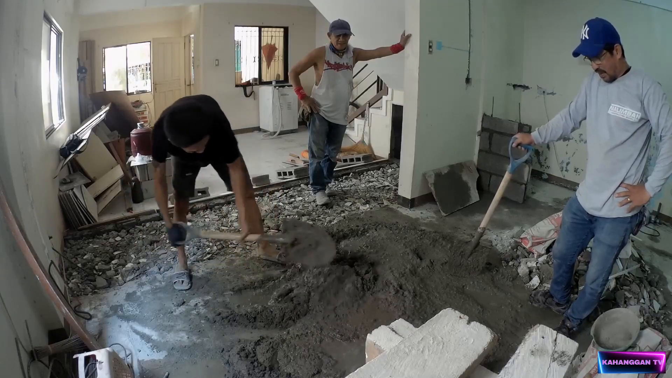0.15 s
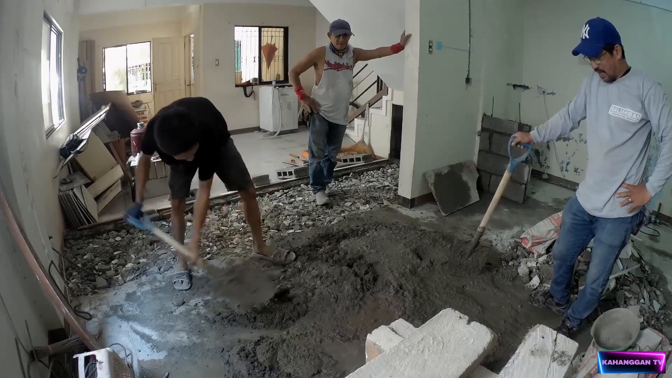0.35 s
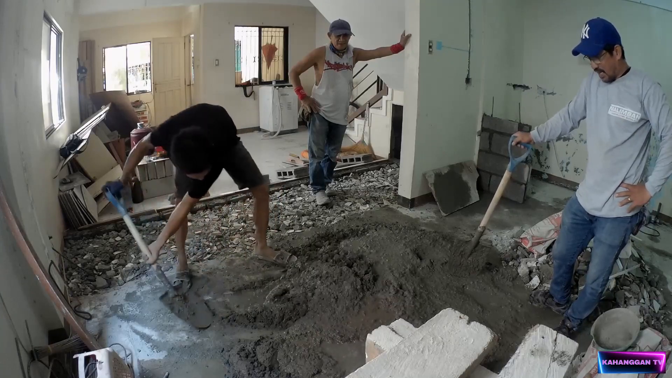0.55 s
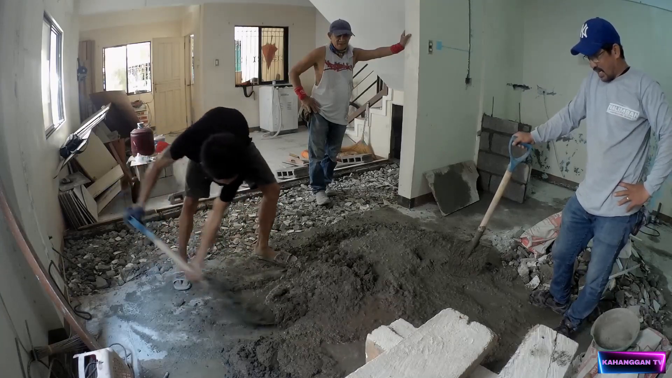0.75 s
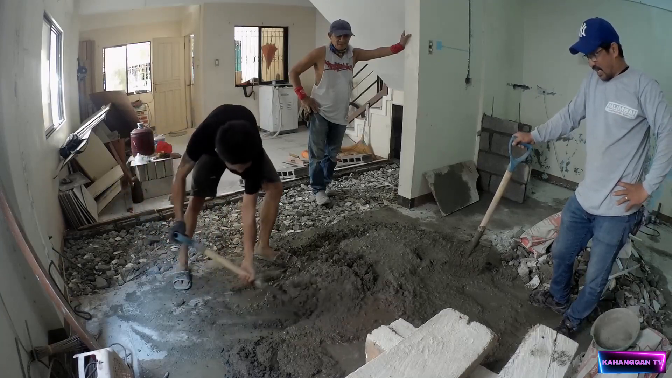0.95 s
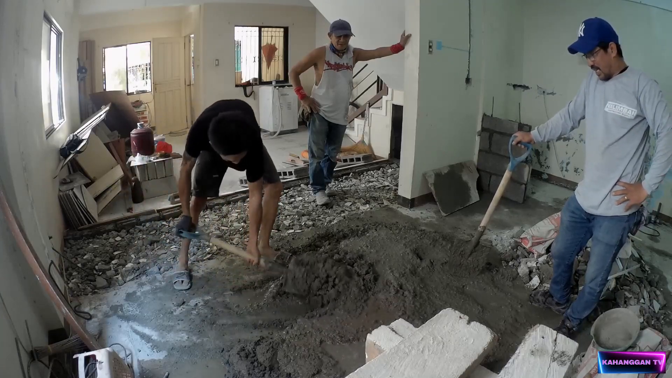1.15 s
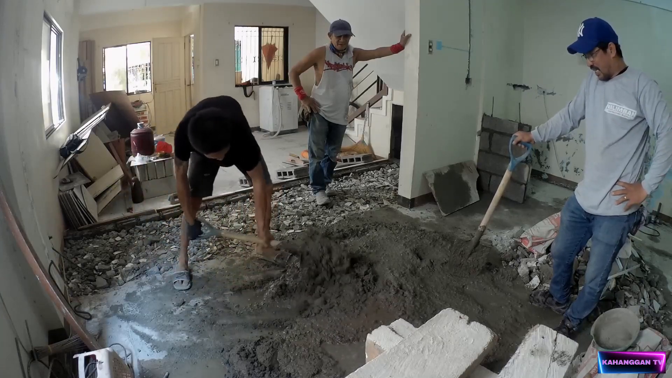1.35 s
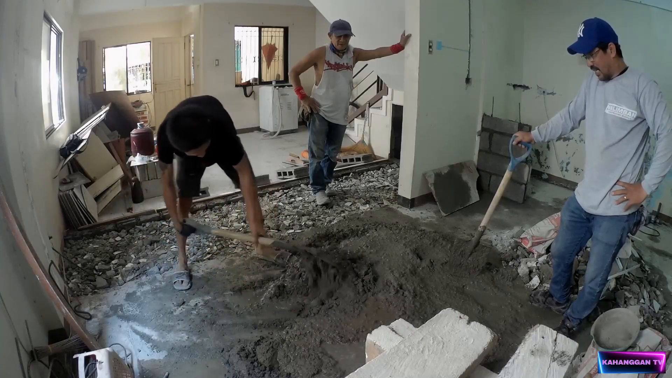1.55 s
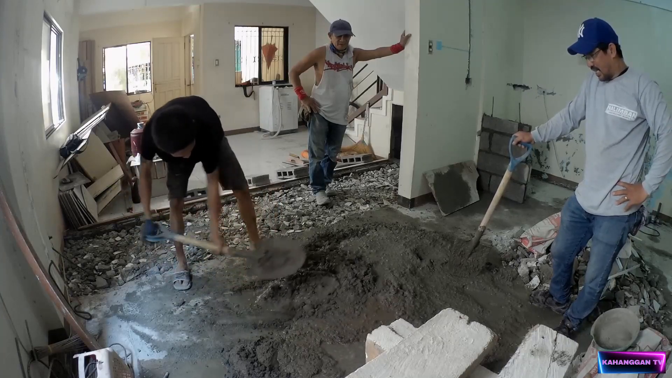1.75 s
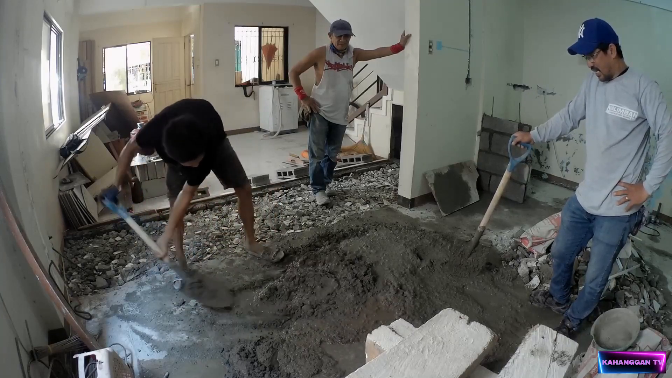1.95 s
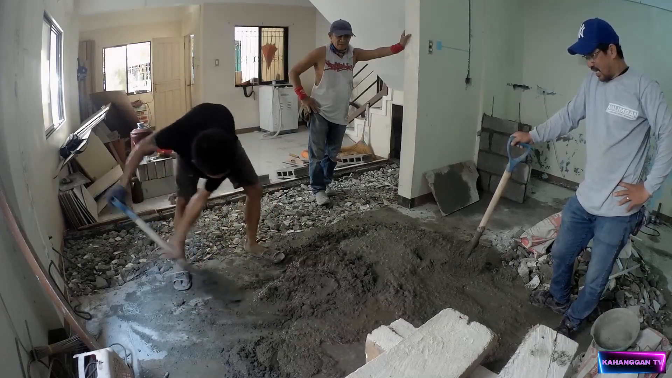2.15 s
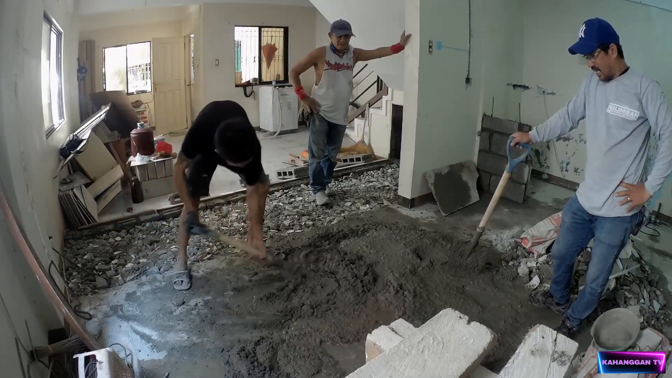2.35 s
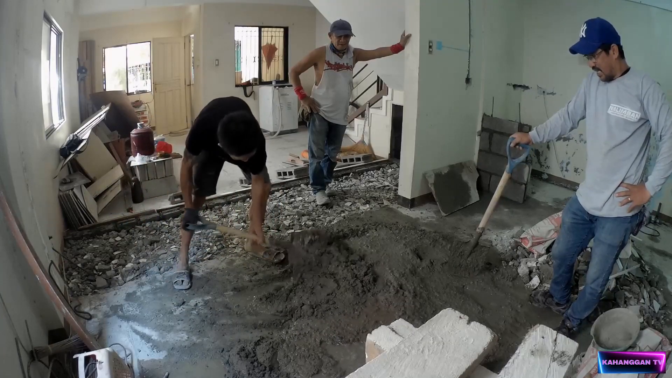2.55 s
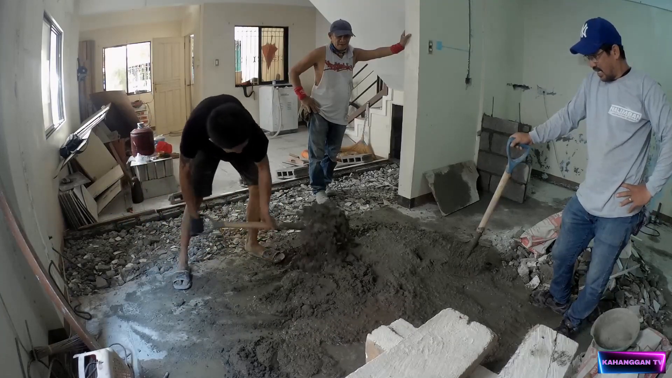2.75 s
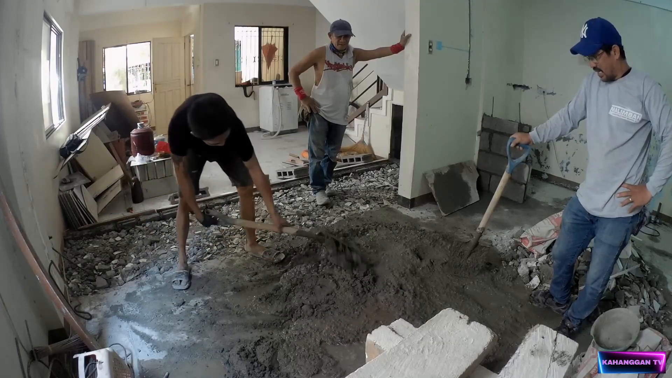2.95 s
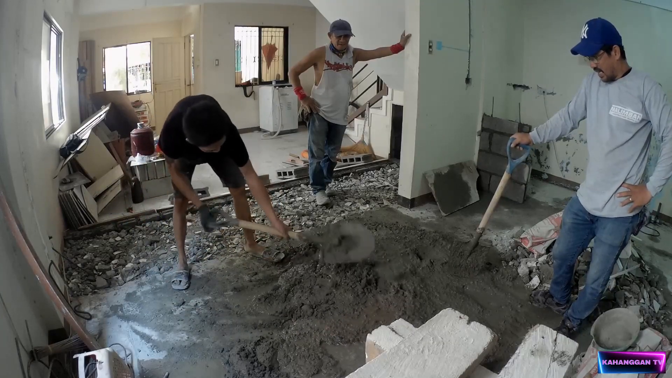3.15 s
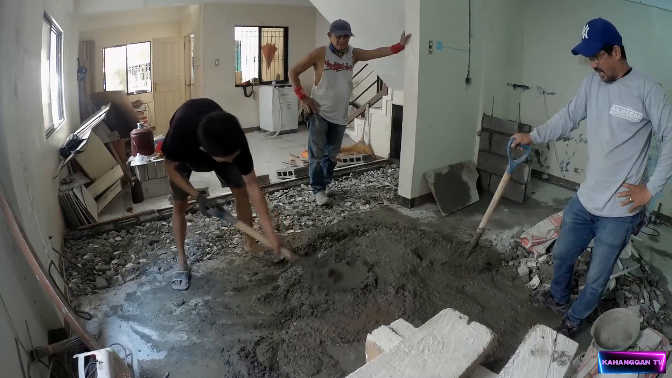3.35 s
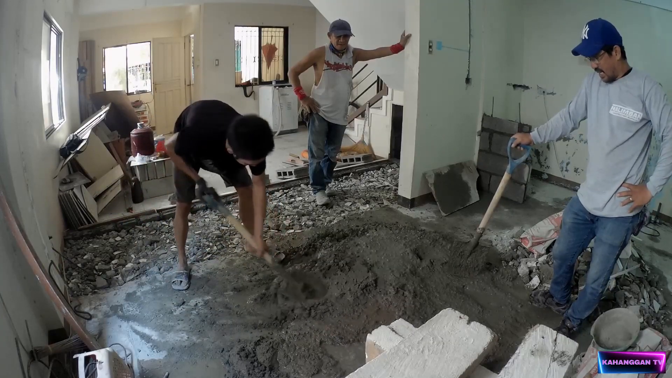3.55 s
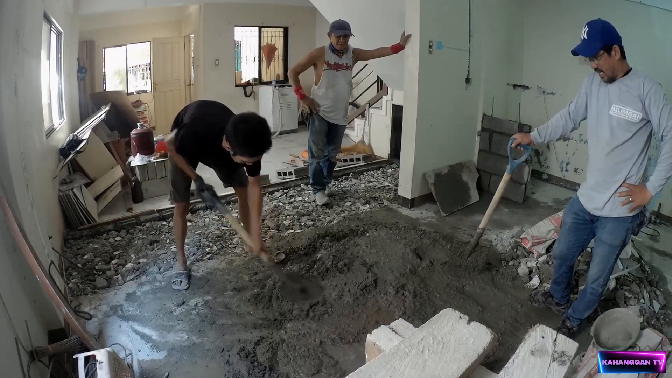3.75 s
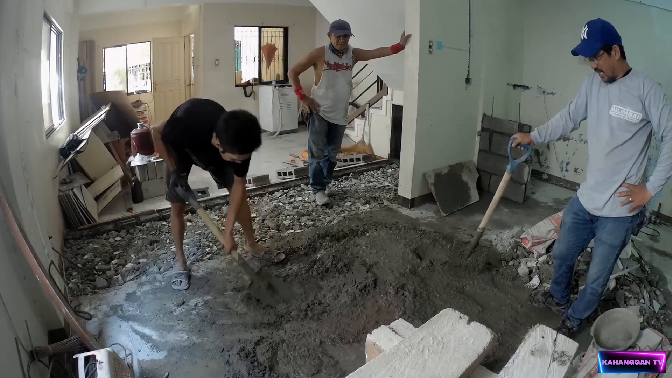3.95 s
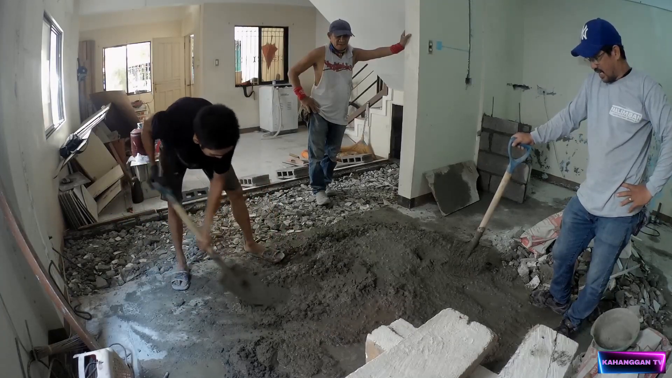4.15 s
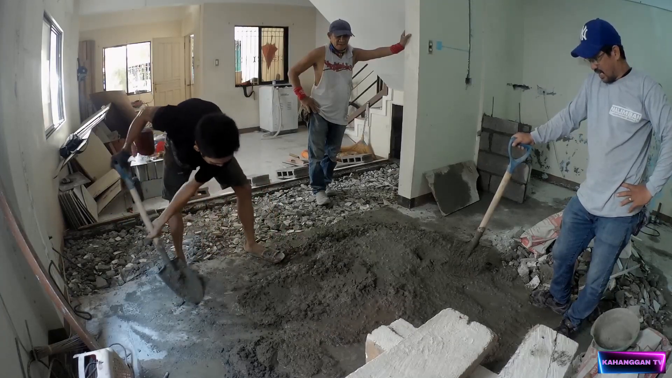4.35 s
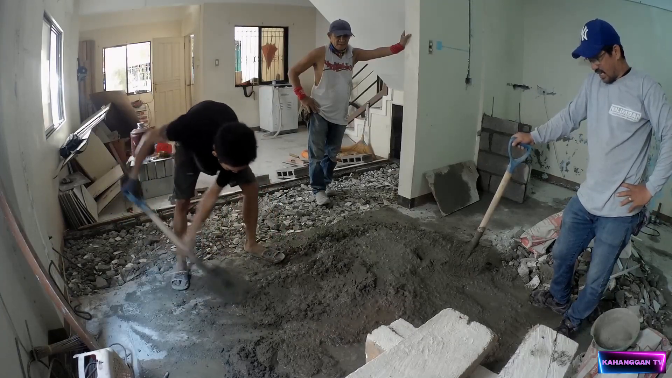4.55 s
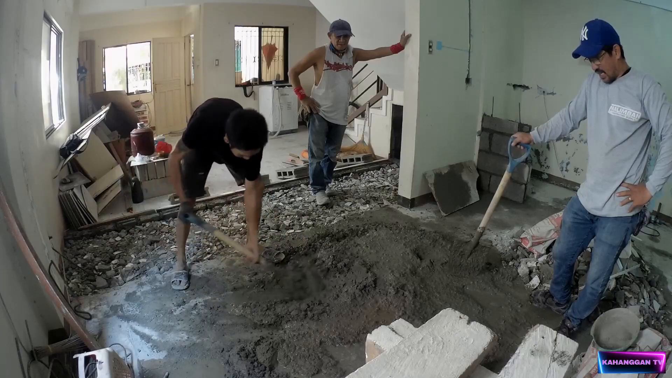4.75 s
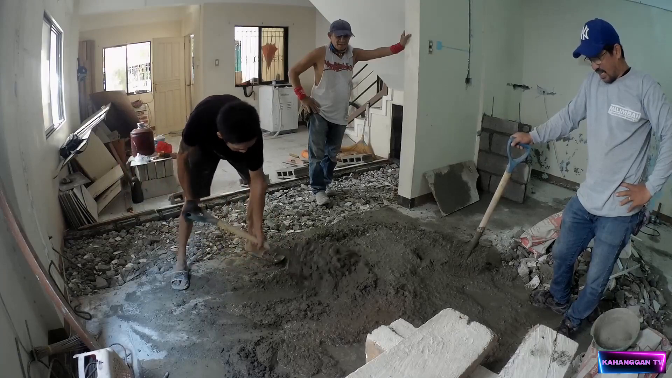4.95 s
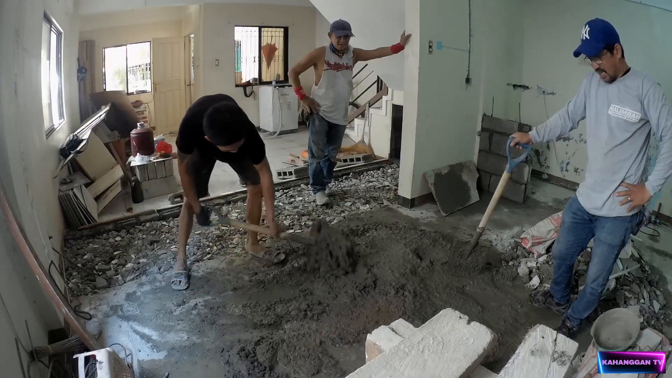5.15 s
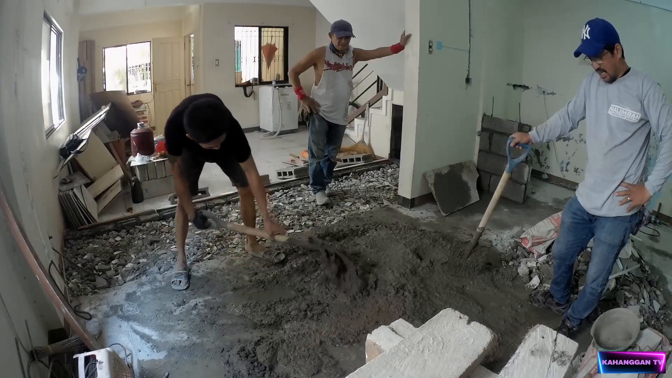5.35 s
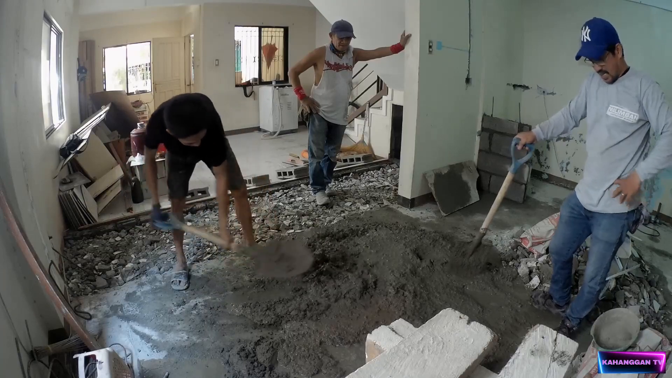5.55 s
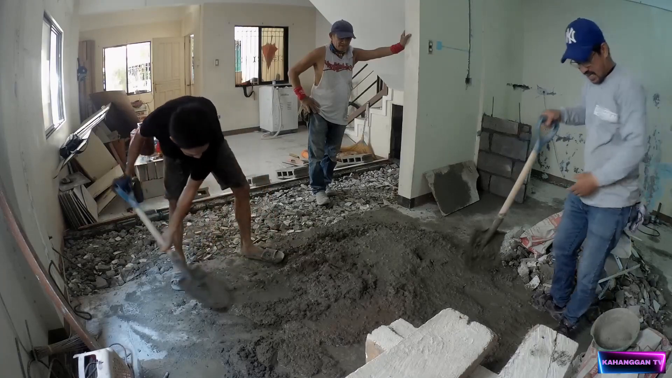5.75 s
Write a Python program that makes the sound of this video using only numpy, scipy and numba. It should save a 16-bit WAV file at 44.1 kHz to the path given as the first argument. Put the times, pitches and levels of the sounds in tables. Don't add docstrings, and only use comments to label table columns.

```python
import sys
import numpy as np
from scipy import signal
from scipy.fft import rfft, irfft
from scipy.io import wavfile
from scipy.ndimage import uniform_filter1d, minimum_filter1d
from numba import njit

SR = 44100
rng = np.random.default_rng(int(sys.argv[2]) if len(sys.argv) > 2 else 0)


def wrap_up_sound(samples):
    columns = np.atleast_2d(samples).T
    tamed = np.clip(columns, -1, 1)
    steps = np.round(tamed * 32767).astype(np.int16)
    wavfile.write(sys.argv[1], SR, steps)


def elevation(decibels):
    levels = np.asarray(decibels, float)
    return 10 ** (levels / 20)


N = 255780

# f/Hz, width/Hz, level/dB
BLADE_MODES = [(275, 55, -5), (330, 14, -8.5), (440, 15, -21), (556, 68, -9.5), (600, 31, 0.5),
               (712, 43, -9), (882, 59, 1.5), (952.5, 17, 2.5), (1140, 78, 1.5), (1087, 123, 6.5),
               (1285, 11, -28), (1360, 94, 6), (1540, 8.4, 1), (1715, 66, 7.5), (1840, 27, -1.5),
               (2260, 250, 5.5), (2552, 35, -4), (2750, 250, 2.5), (3060, 29, -7), (3360, 160, -31),
               (3800, 130, -11), (4600, 520, -50), (6130, 280, -11), (7600, 130, -25)]


def rms_one(x):
    return x / np.sqrt(np.mean(x ** 2) + 1e-20)


def peak_one(x):
    return x / np.abs(x).max()


def place(out, s, sound):
    i = round(s * SR)
    out[i:i + len(sound)] += sound[:N - i]


def in_time(rows):
    s, *columns = np.transpose(rows)
    return [np.interp(np.arange(N) / SR, s, c) for c in columns]


def at_hz(points, hz):
    table_hz, values = np.array(points).T
    return np.interp(np.log(hz), np.log(table_hz), values)


def drift(rate):
    r = np.exp(-80 * np.pi * rate / SR)
    slow = signal.lfilter([1], [1, -2 * r, r * r], rng.standard_normal(N // 40 + 2002))[2000:]
    return np.interp(np.arange(N) / 40, np.arange(len(slow)), rms_one(slow))


def resonate(x, hz, width_hz):
    r, w = np.exp(-np.pi * width_hz / SR), 2 * np.pi * hz / SR
    return signal.lfilter([0, np.sin(w)], [1, -2 * r * np.cos(w), r * r], x + 1e-18)


@njit
def glide(x, turn, r):
    y = np.zeros(len(x))
    for i in range(2, len(x)):
        y[i] = np.sin(turn[i]) * x[i - 1] + 2 * r * np.cos(turn[i]) * y[i - 1] - r * r * y[i - 2]
    return y


def colour(x, spectrum):
    hz = np.maximum(np.fft.rfftfreq(N, 1 / SR), 1)
    return rms_one(irfft(rfft(x) * elevation(at_hz(spectrum, hz)), N))


def high_pass(x, hz):
    return signal.sosfilt(signal.butter(3, hz, "high", fs=SR, output="sos"), x)


def grains(per_s, spread_db, clump_db, clump_rate):
    sizes = elevation(spread_db * np.minimum(rng.exponential(1, N), 4)) * rng.choice([-1, 1], N)
    struck = rng.random(N) < per_s / SR
    return rms_one(sizes * struck * elevation(clump_db * drift(clump_rate)))


def blade(grit, modes, bright_db):
    spots, total = grit * rng.choice([-1, 1], (3, N)), 0
    for k, (hz, width, db) in enumerate(modes):
        level_db = db + 1.4 * drift(2.8) + bright_db * np.log2(hz / 1500)
        total = total + elevation(level_db) * rms_one(resonate(spots[k % 3], hz, width))
    return total


def strokes(rows, lift_db, stretch, fall, swell):
    slowing_db_s2 = 57.5
    t, power = np.arange(0, N + 32, 32) / SR, 0
    for (s, rise, db, fall_db_s, *_), lift in zip(rows, np.broadcast_to(lift_db, len(rows))):
        up = np.clip((t - s) / (stretch * rise), 0, 1) ** swell
        late = np.maximum(t - s - stretch * rise, 0)
        lost_db = fall * (fall_db_s * late + slowing_db_s2 * late ** 2)
        power = power + (up * elevation(db + lift - lost_db)) ** 2
    return np.interp(np.arange(N) / SR, t, power)


def motion():
    # start t/s, rise/s, grit peak level/dB, fall/(dB/s), load re grit level/dB
    scoops = [(.725, 0.052, -18.5, 30, -13), (.77, 0.059, -20, 11, -3), (.855, 0.062, -8, 130, -6),
              (.985, 0.032, -16, 60, -3.5), (2.139, 0.018, -24, 90, -15), (2.215, 0.034, -15, 22, -13),
              (2.255, 0.039, -10.5, 84, -13), (2.32, 0.047, -7.5, 154, -2), (2.38, 0.06, -17, 45, 1),
              (3.357, 0.017, -24, 100, -20), (3.41, 0.05, -25, 44, -26), (3.46, 0.06, -22.5, 107, -9),
              (3.55, 0.047, -29.5, 10, 1.5), (3.63, 0.071, -14, 106, -4), (3.72, 0.04, -23, 70, -4),
              (3.8, 0.13, -24.5, 46, -4), (3.95, 0.085, -23, 107, -1), (4.558, 0.032, -17.5, 12, -20),
              (4.6, 0.073, -12, 88, -11.5), (4.8, 0.07, -21, 66, 0.5), (4.665, 0.046, -9, 90, -6.5),
              (4.75, .04, -16, 55, -1)]
    shuffles = [(-.05, 0.019, -26.5, 41, -5), (.1, 0.065, -30.5, 63, -6), (.5, 0.053, -47, 41, 5),
                (.61, .02, -36, 25, -5), (1.379, 0.062, -29.5, 50, -6.5), (1.52, 0.17, -31.5, 83, -8.5),
                (1.778, 0.066, -43.5, 37, -29), (2.7, 0.16, -41, 12, -11.5), (2.96, 0.015, -36, 37, -0.5),
                (.3, 0.22, -42, 5, -10), (1.9, 0.11, -79.5, 5, 10), (2.98, 0.13, -25.5, 145, -9),
                (3.2, 0.075, -38, 25, -30), (4.17, 0.11, -29, 110, -32), (4.487, 0.0063, -38, 58, -14),
                (5.1, 0.091, -39.5, 5, -8), (5.258, 0.027, -28, 61, -2), (5.35, 0.077, -29.5, 68, -28),
                (5.505, 0.029, -33, 92, -27), (5.62, 0.058, -33.5, 71, -3.5)]
    # start t/s, rise/s, peak level/dB, fall/(dB/s)
    slides = [(-.05, 0.054, -40.5, 3), (.16, 0.0055, -37, 81), (.62, 0.02, -46, 92), (.722, 0.11, -27, 39),
              (.84, 0.072, -22, 109), (1.395, 0.024, -42, 28), (1.645, 0.03, -38, 80),
              (2.14, 0.011, -29, 220), (2.16, .02, -40, 30), (2.21, 0.17, -20, 157), (2.62, 0.54, -43, 24),
              (2.962, 0.012, -44.5, 64), (.25, 0.04, -64.5, 61.5), (1.2, 0.073, -52, 4),
              (5.05, 0.1, -49, 10), (3.0, 0.094, -38, 111), (3.22, 0.033, -58, 35),
              (3.357, 0.012, -34.5, 58), (3.42, 0.05, -34.5, 27), (3.64, 0.049, -30, 112),
              (3.83, 0.1, -39, 29), (3.97, 0.062, -37, 86), (4.18, 0.047, -44.5, 60),
              (4.557, 0.014, -35.5, 32), (4.58, 0.065, -29, 25), (4.65, 0.055, -22, 97),
              (4.75, 0.043, -41, 48), (3.54, .05, -42, 15), (5.24, 0.074, -43, 30),
              (5.33, 0.12, -40.5, 100), (5.505, 0.021, -42.5, 70), (5.62, 0.09, -48, 72)]
    rows = scoops + shuffles
    load_re_grit_db = [row[-1] for row in rows]
    grit = strokes(rows, 0, stretch=0.96, fall=0.94, swell=0.71) + elevation(2 * -63)
    slump = strokes(rows, load_re_grit_db, stretch=1.37, fall=0.88, swell=0.9) + elevation(2 * -89)
    sand = strokes(slides, 0, stretch=0.81, fall=1, swell=0.76) + elevation(2 * -77)
    grit_db, slump_db, sand_db = 10 * np.log10([grit, slump, sand])
    half_full_db, fill_range_db = -1, 4.5
    fill = 1 / (0.5 + np.exp((half_full_db - slump_db + grit_db) / fill_range_db))
    return grit_db, slump_db, sand_db, fill


def scrape(grit_db, fill):
    # f/Hz, level/dB
    rasp_spectrum = [(240, -40), (400, -77), (697, 2), (1000, -12), (1190, 1.5), (1710, -2), (1850, 0.5),
                     (2510, -4), (3400, -15), (6000, -38), (7800, -50), (13200, -120)]
    bare_db, full_db = 2, -5
    bright_db = bare_db + (full_db - bare_db) * fill
    grit = grains(5000, spread_db=2.5, clump_db=1.0, clump_rate=40)
    modes = high_pass(blade(grit, BLADE_MODES[6:], bright_db), 480)
    rasp = colour(grit, rasp_spectrum)
    dull = signal.sosfilt(signal.butter(1, 1500, fs=SR, output="sos"), rasp)
    tilted = elevation(-bright_db) * dull + elevation(bright_db) * (rasp - dull)
    return elevation(grit_db) * (elevation(-21.5) * modes + elevation(-6.0) * tilted)


def pocket(grit_db, fill):
    # t/s, f/Hz
    pocket_paths = [
        [(0.0, 1080), (0.104, 1630), (0.234, 1050), (0.33, 1180), (0.37, 936), (0.496, 1230), (0.7, 1230)],
        [(0.72, 1410), (0.764, 1650), (0.812, 1070), (0.884, 1440), (0.99, 970), (1.37, 943), (1.4, 1130)],
        [(1.42, 1420), (1.46, 1630), (1.556, 1290), (1.738, 1660), (1.79, 956), (1.868, 1400), (2.0, 954)],
        [(2.13, 1550), (2.302, 1700), (2.412, 970), (2.472, 1180), (2.526, 850), (2.674, 1041), (2.8, 928)],
        [(2.95, 1140), (2.994, 1210), (3.022, 1020), (3.114, 1450), (3.222, 1140), (3.26, 1450), (3.3, 1540)],
        [(3.35, 1640), (3.56, 1560), (3.606, 1210), (4.092, 1170), (4.138, 966), (4.262, 1650), (4.4, 1540)],
        [(4.55, 2260), (4.594, 1690), (4.896, 1090), (4.966, 1140), (5.006, 1060), (5.174, 1210), (5.2, 1180)],
        [(5.25, 1240), (5.286, 1010), (5.374, 1250), (5.604, 1440), (5.672, 984), (5.766, 980), (5.8, 1240)],
    ]
    hz, = in_time(np.vstack(pocket_paths))
    bare_db, full_db = -9, -8
    pocket_db = bare_db + (full_db - bare_db) * fill
    turn, r = 2 * np.pi * hz / SR, np.exp(-np.pi * 600 / SR)
    grit = grains(4000, spread_db=1.0, clump_db=1.5, clump_rate=30)
    rung = glide(glide(grit, turn, r), turn, r)
    return elevation(grit_db + pocket_db) * rms_one(rung * (hz / 1500) ** 0.064)


def load(slump_db, sand_db):
    # f/Hz, level/dB
    slump_spectrum = [(59, -54), (100, -33.5), (220, -13), (324, 1.5), (491, 8.5), (568, 0.5), (900, 3.5),
                      (1170, -20), (1980, -120)]
    # f/Hz, level/dB
    sand_spectrum = [(2060, -1), (3500, -3), (5460, -10.5), (6680, -6.5), (8010, -7), (10000, -16.5),
                     (12500, -10), (14600, -19), (15700, -25)]
    tumble = grains(1500, spread_db=3.0, clump_db=0.5, clump_rate=54)
    clacks = rms_one(high_pass(blade(tumble, BLADE_MODES[:6], 0), 224))
    stones = colour(tumble, slump_spectrum) + elevation(-4.0) * clacks
    sand = colour(grains(9000, spread_db=0.5, clump_db=1.4, clump_rate=14), sand_spectrum)
    return elevation(slump_db - 7.5) * stones + elevation(sand_db + 2.0) * high_pass(sand, 2000)


def slab(slump_db):
    # f/Hz, width/Hz, level/dB
    floor_modes = [(137.4, 5.2, -5), (166.9, 3.2, -2.5), (212.4, 27, -1.5), (251.6, 17.7, 1),
                   (336, 14, 0.5)]
    # t/s, level/dB, fade/s
    dumps = [
        (3.06, -41, 0.042),
        (3.66, -23.5, 0.059),
        (3.82, -35, 0.2),
        (4.012, -28, 0.15),
        (4.4, -51, 0.29),
        (5.72, -60, .1),
    ]
    shake, t = rng.standard_normal(N), np.arange(N) / SR
    modes = sum(elevation(db) * rms_one(resonate(resonate(shake, hz, width), hz, 2.14 * width))
                for hz, width, db in floor_modes)
    lag_s, idle_db = 0.017, -51.5
    drive = elevation(-14 + np.interp(t - lag_s, t, slump_db)) + elevation(idle_db)
    for s, db, fade in dumps:
        late = np.maximum(t - s, 0)
        drive = drive + elevation(db) * (1 - np.exp(-late / 0.004)) * np.exp(-late / fade)
    return elevation(-9.0) * drive * rms_one(modes)


def drone():
    # t/s, level/dB
    motor_load = [(0.0, -57), (0.1, -57), (0.16, -66), (0.79, -46), (1.05, -71), (1.44, -48.5),
                  (1.85, -47.5), (2.3, -50.5), (2.99, -59), (3.44, -53), (3.51, -75), (3.67, -51.5),
                  (4.88, -54), (4.99, -39.5), (5.49, -52.5), (5.74, -48), (5.8, -54)]
    upper_db, = in_time(motor_load)
    upper, lower = (rms_one(resonate(resonate(rng.standard_normal(N), hz, width), hz, 1.9 * width))
                    for hz, width in [(84.3, 9.3), (49.7, 11)])
    lower_db = -57 + 0.5 * (upper_db - upper_db.mean()) + 1.5 * drift(0.21)
    return elevation(upper_db - 0.9) * upper + elevation(lower_db) * lower


def room_air():
    # f/Hz, level/dB
    air_spectrum = [(15, -42), (25, -49), (70, -0.5), (199, -10), (423, -2), (1720, -6.5), (4920, -23.5),
                    (7780, -22.5), (10200, -26), (12600, -23), (15700, -29)]
    return elevation(-46.5) * colour(rng.standard_normal(N), air_spectrum)


def room(x):
    # f/Hz, t60/s
    room_t60 = [(100, 1.0), (500, 0.74), (2000, 0.51), (6000, 0.9), (14000, 0.36)]
    t, tail = np.arange(int(1.2 * SR)) / SR, 0
    edges = 60 * 2 ** np.arange(0, 8.5, .5)
    for low, high in zip(edges, edges[1:]):
        band_pass = signal.butter(2, [low, high], "band", fs=SR, output="sos")
        band = signal.sosfilt(band_pass, rng.standard_normal(len(t)))
        tail = tail + band * elevation(-60 * t / at_hz(room_t60, np.sqrt(low * high)))
    tail *= 1 - np.exp(-t / 0.0045)
    return signal.fftconvolve(x, tail / np.sqrt(np.sum(tail ** 2)))[:N]


def crunches():
    # t/s, peak level/dB, f/Hz
    crushed = [(0.168, -21, 829), (0.375, -25, 813), (0.556, -22, 1110), (0.629, -19, 1750),
               (0.738, -19, 926), (0.757, -7, 1690), (0.809, -3.5, 670), (0.867, -4, 1760),
               (0.918, 2, 1170), (1.019, -4, 1150), (1.17, -11, 1120), (1.41, -22, 1030),
               (1.446, -15.5, 2310), (1.563, -23, 1090), (1.631, -18, 1740), (1.8, -28, 807),
               (1.818, -25, 910), (1.835, -21, 999), (2.121, -26, 764), (2.147, -16, 1650),
               (2.236, -4.5, 1750), (2.25, -5, 1660), (2.282, -2, 1750), (2.5, -21, 907), (2.533, -3, 659),
               (2.587, -12, 743), (2.629, -8.5, 711), (2.828, -32, 710), (2.967, -24, 870),
               (3.026, -27, 740), (3.047, -19, 1420), (3.071, -13, 1410), (3.21, -25, 759),
               (3.363, -21, 1570), (3.427, -18, 2540), (3.514, -14, 1720), (3.625, -10, 840),
               (3.663, -5, 1310), (3.697, -9, 1030), (3.837, -9, 703), (3.937, -13, 1790),
               (4.239, -21, 1600), (4.495, -31, 2390), (4.569, -16, 2430), (4.693, 7, 1690),
               (4.714, 0, 1680), (5.124, -27, 939), (5.267, -20, 1740), (5.282, -26, 850),
               (5.318, -23, 869), (5.438, -17, 1110), (5.517, -19, 1960), (5.532, -14, 1800),
               (5.648, -20, 886), (5.699, -25, 934)]
    out, t = np.zeros(N), np.arange(SR // 20) / SR
    for s, db, hz in crushed:
        burst = rng.standard_normal(len(t)) * np.exp(-t / 0.0054)
        place(out, s, elevation(db - 6.5) * peak_one(resonate(burst, hz, 0.28 * hz)))
    return out


def thuds():
    # t/s, peak level/dB, thud f/Hz, ring width/Hz
    landings = [
        (0.169, -28, 600, 400),
        (2.261, -20, 330, 60),
        (3.079, -24.5, 463, 300),
        (3.662, -15, 450, 200),
        (3.679, -7, 111, 40),
        (4.03, -21.5, 320, 100),
        (5.277, -20, 480, 350),
        (5.279, -23, 804, 300),
        (5.339, -32, 395, 100),
        (5.375, -31.5, 330, 60),
    ]
    out, t = np.zeros(N), np.arange(SR // 4) / SR
    for s, db, hz, width in landings:
        splat = rng.standard_normal(len(t)) * t * np.exp(-t / 0.0046)
        place(out, s, elevation(db) * peak_one(resonate(resonate(splat, hz, width), hz, 270)))
    return out


def sings():
    # t/s, f/Hz, peak level/dB, rise/s, fall/s
    sung = [(0.549, 1160, -41, 0.012, 0.05), (.8, 275, -34.5, .03, 0.05), (.885, 1200, -10.5, 0.03, 0.035),
            (0.877, 2300, -14, .018, 0.015), (1.0, 583, -23, 0.055, 0.1), (1.012, 1900, -23, 0.0084, .02),
            (1.081, 440, -38, 0.014, 0.27), (2.141, 3350, -23.5, 0.0072, 0.0097),
            (2.139, 1180, -21.5, .006, 0.011), (2.148, 1756, -19.5, .009, 0.013),
            (2.232, 1676, -24, 0.009, 0.025), (2.28, 1765, -17, .018, 0.018),
            (2.28, 2537, -14, 0.017, 0.04), (2.344, 1480, -17, 0.018, 0.053),
            (2.35, 888, -16, 0.029, 0.047), (2.598, 323, -30, .02, 0.13), (3.67, 1770, -20.5, .01, 0.11),
            (3.681, 1034, -14.5, 0.018, 0.036), (3.665, 1299, -20, .01, 0.036),
            (4.562, 2443, -17.5, 0.0085, 0.018), (4.612, 325, -30.5, .02, .05),
            (4.62, 1684, -10, 0.029, 0.02), (4.701, 1683, -9.5, 0.02, 0.029),
            (4.715, 1320, -13, 0.02, 0.034), (4.795, 564, -18.5, .015, .02), (4.88, 550, -34, 0.013, 0.072),
            (5.43, 1134, -32, 0.026, 0.04), (5.529, 1167, -31.5, 0.026, 0.026), (5.65, 899, -45, .01, 0.12)]
    roughness = .05
    out, t = np.zeros(N), np.arange(SR // 2) / SR
    for s, hz, db, rise, fall in sung:
        shake = rms_one(signal.lfilter([1], [1, -.98], rng.standard_normal(len(t))))
        tone = np.sin(2 * np.pi * hz * (t + roughness * np.cumsum(shake) / SR))
        shape = np.minimum(t / rise, 1) * np.exp(-(np.maximum(t - rise, 0) / fall) ** 2)
        place(out, s, elevation(db) * tone * shape)
    return out


def knocks():
    # t/s, peak level/dB, own ring f/Hz, own ring re blade level/dB, rattle length/s
    edge_hits = [(0.626, -22, 1670, 1, 0.015), (0.655, -28, 1650, -14, 0.008),
                 (0.739, -18, 2500, -13, 0.022), (0.902, -9, 1240, -3, 0.011), (1.016, -14, 2750, 8, 0.011),
                 (1.643, -23.5, 1960, -5.5, 0.0094), (2.15, -33, 5200, -7, 0.006),
                 (2.146, -19.5, 3300, -9, 0.0063), (2.238, -24, 7600, -2, .006),
                 (2.283, -4.5, 2800, -4, 0.0059), (3.368, -23, 2184, 2, .02),
                 (3.444, -18.5, 2570, 6, 0.0082), (3.51, -19, 1830, -3, 0.012),
                 (3.666, -18, 1330, 1, 0.011), (3.694, -11.5, 1020, 1, 0.0084),
                 (4.486, -30, 2330, 8, 0.029), (4.493, -40, 2900, -10, 0.013), (4.57, -19, 2470, -3, 0.015),
                 (5.284, -26, 1820, 3, 0.005), (5.441, -31, 1180, 0, 0.012), (5.501, -35, 1800, 9, 0.011),
                 (5.535, -24, 1800, 7, 0.009), (5.645, -29.5, 900, 3, 0.045)]
    out, t = np.zeros(N), np.arange(SR // 6) / SR
    for s, db, hz, own_db, length in edge_hits:
        rattle = rng.standard_normal(len(t)) * np.exp(-t / length)
        luck_db = rng.normal(0, 1.9, len(BLADE_MODES))
        steel = sum(elevation(mode_db + luck) * resonate(rattle, mode_hz, 1.5 * width)
                    for (mode_hz, width, mode_db), luck in zip(BLADE_MODES[8:], luck_db))
        ring = elevation(own_db) * peak_one(resonate(rattle, hz, 79))
        crack = elevation(-2.0) * peak_one(rattle)
        place(out, s, elevation(db) * peak_one(peak_one(steel) + ring + crack))
    return out


def air_shoves():
    # t/s, peak level/dB
    pushes = [
        (.92, -29),
        (2.37, -38),
        (3.69, -52),
        (4.72, -31.5),
    ]
    shove = np.zeros(N)
    for s, db in pushes:
        late = np.arange(N) / SR - s
        shove += elevation(db) * np.sin(2 * np.pi * 45 * late) * np.exp(-(late / 0.011) ** 2)
    return shove


def scene():
    grit_db, slump_db, sand_db, fill = motion()
    hits = high_pass(knocks() + crunches() + pocket(grit_db, fill), 640)
    steel = high_pass(scrape(grit_db, fill) + hits, 394)
    wet = high_pass(high_pass(load(slump_db, sand_db) + thuds(), 270), 222)
    shovel = sings() + steel + wet
    background = high_pass(drone() + room_air(), 34)
    return (shovel + elevation(-10.0) * room(shovel) + air_shoves() + slab(slump_db) + background)[None]


def limiter(x):
    ceiling, release_db_s, span = .72, 900, SR // 1000
    over_db = np.maximum(20 * np.log10(np.abs(x[0]) / ceiling + 1e-9), 0)
    fall_db = release_db_s * np.arange(N) / SR
    held_db = np.maximum.accumulate(over_db + fall_db) - fall_db
    ahead_db = -minimum_filter1d(-held_db, size=2 * span + 1)
    return x * elevation(-uniform_filter1d(ahead_db, size=span))


def treble_gaps(x):
    # from t/s, to t/s
    gaps = [
        (2.106, 2.172),
        (4.539, 4.572),
    ]
    dull = signal.sosfiltfilt(signal.cheby2(16, 50, 9200, fs=SR, output="sos"), x)
    t = np.arange(N) / SR
    dullness = sum(np.clip(np.minimum(t - a, b - t) / .004, 0, 1) for a, b in gaps)
    return x + dullness * (dull - x)


def low_pass(x):
    return signal.sosfilt(signal.butter(12, 15820, fs=SR, output="sos"), x)


def record(dry):
    x = limiter(dry)
    x = signal.sosfilt(signal.cheby2(16, 55, 15900, fs=SR, output="sos"), x)
    return low_pass(treble_gaps(x))


dry = scene()
out = record(dry)
wrap_up_sound(out)
```